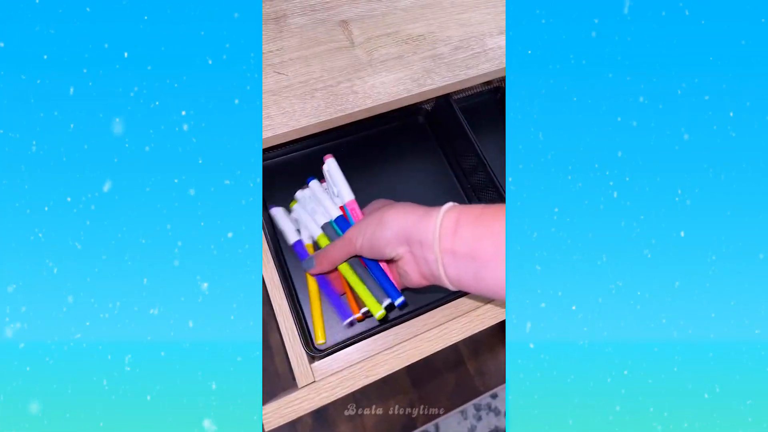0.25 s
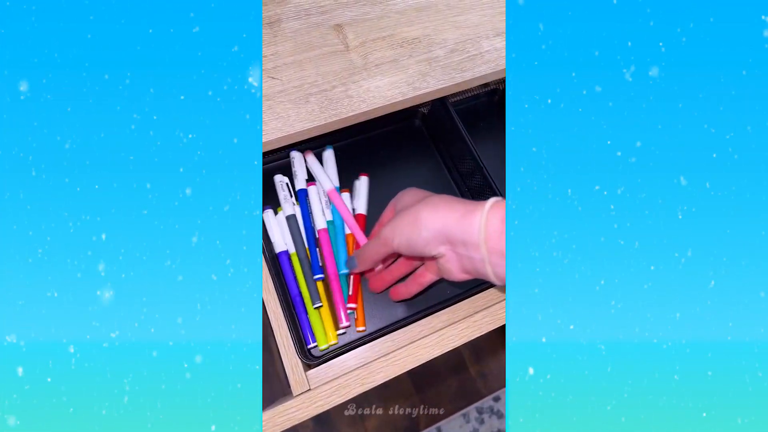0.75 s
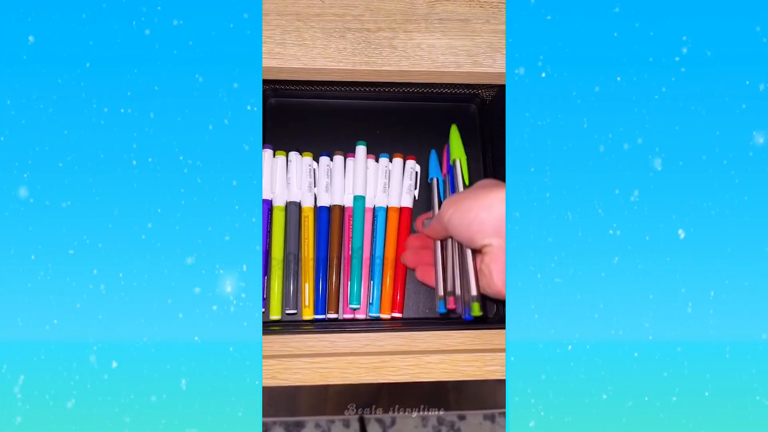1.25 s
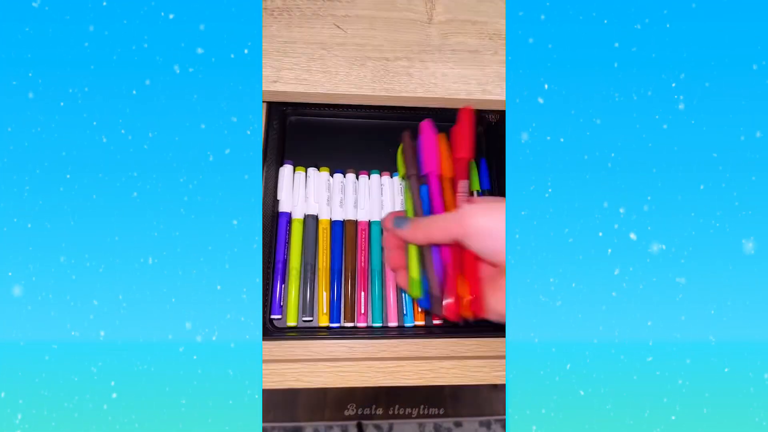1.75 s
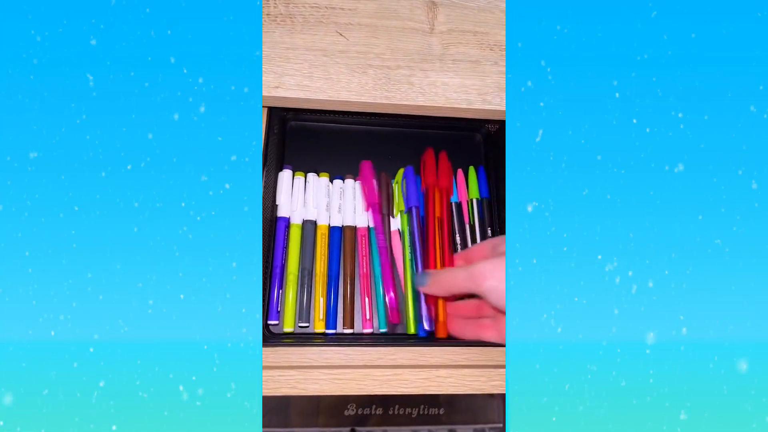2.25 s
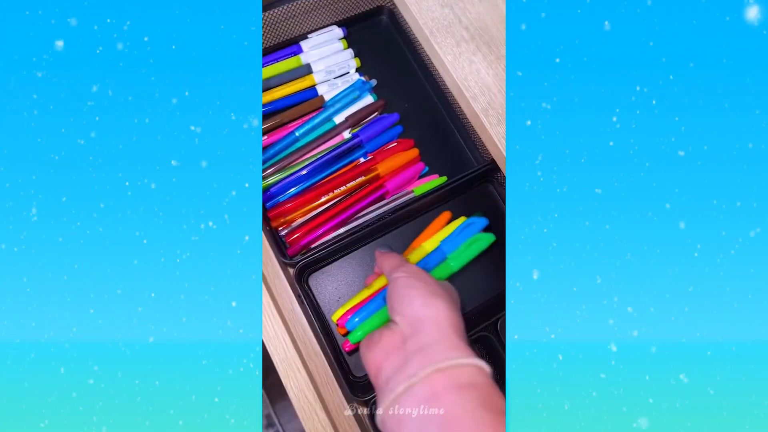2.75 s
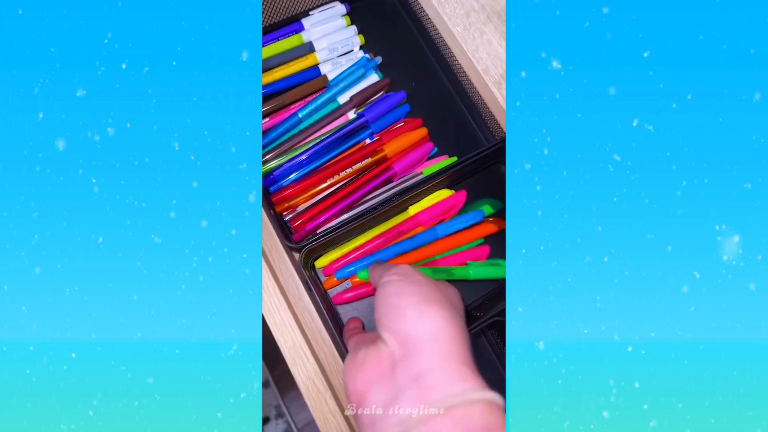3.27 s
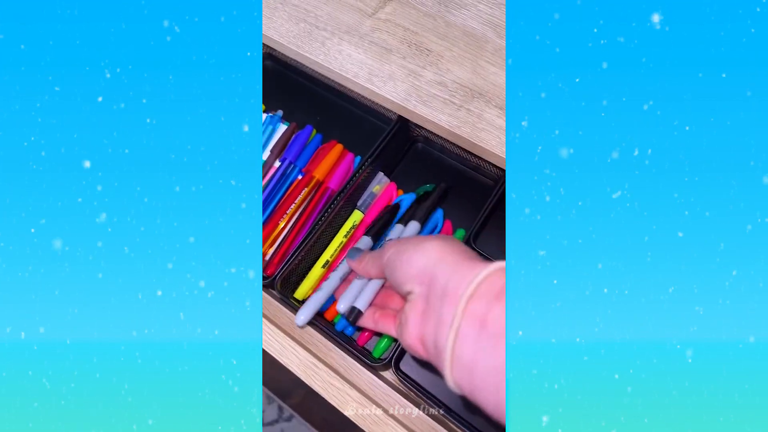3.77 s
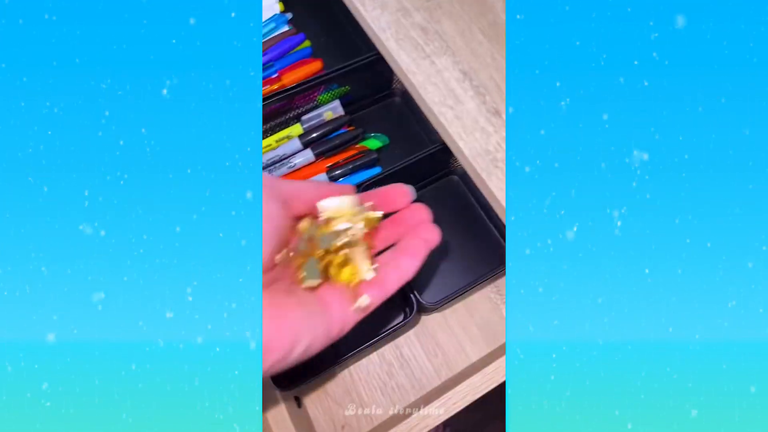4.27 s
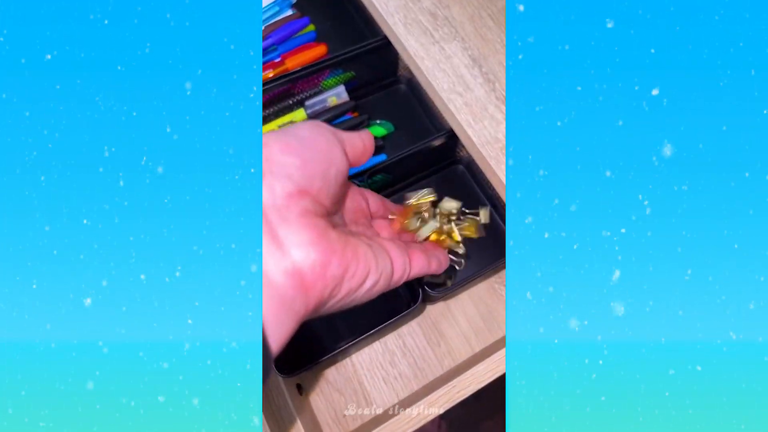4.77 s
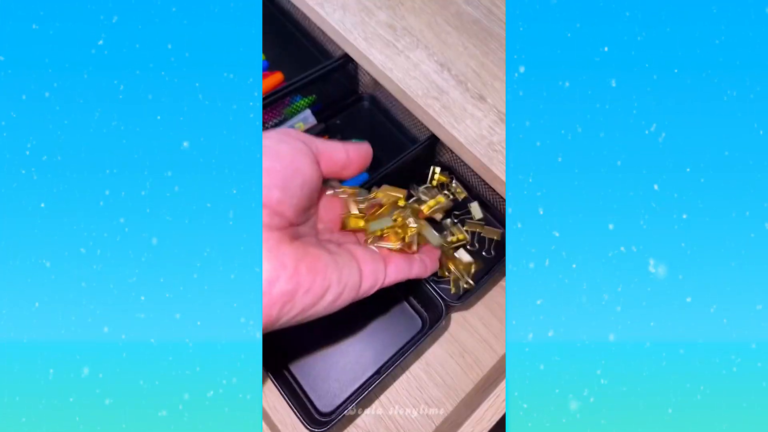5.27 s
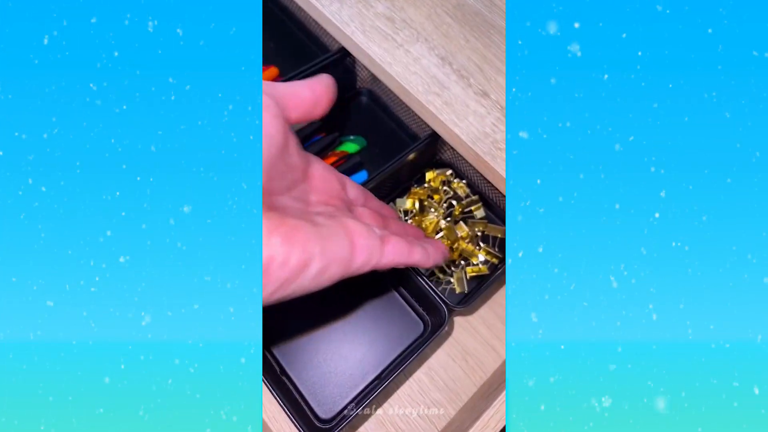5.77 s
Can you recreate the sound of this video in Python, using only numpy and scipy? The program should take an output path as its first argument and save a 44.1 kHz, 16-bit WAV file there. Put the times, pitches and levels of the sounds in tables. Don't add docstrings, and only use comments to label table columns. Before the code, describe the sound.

Very close to a phone microphone, hands lay handfuls of hollow plastic pens into a plastic tray in a wooden drawer, with clicks, knocks and dense rattling. Two handfuls of thicker markers follow, knocking harder. Then small metal clips jingle softly in the palm and spill in two bright, sharp clattering bursts. Faint hiss and low rumble lie beneath, with an appliance hum late on; the scene cuts abruptly between handfuls.

```python
import sys
import numpy as np
from scipy import signal
from scipy.fft import rfft, irfft
from scipy.io import wavfile
from scipy.ndimage import uniform_filter1d

SR = 44100
rng = np.random.default_rng(int(sys.argv[2]) if len(sys.argv) > 2 else 0)


def transcribe(signal):
    frames = np.atleast_2d(signal).T
    limited = np.clip(frames, -1, 1)
    pcm = np.round(limited * 32767).astype(np.int16)
    wavfile.write(sys.argv[1], SR, pcm)


def how_loud(loudness_db):
    steps = np.asarray(loudness_db, float) / 20
    return 10 ** steps


N = 265393


def evened(x):
    return x / np.sqrt(np.mean(x ** 2) + 1e-20)


def read(points, hz):
    f, value = np.transpose(points)
    return np.interp(np.log(hz + 1), np.log(f + 1), value)


def coloured_noise(spectrum, size, level_db):
    white = rfft(rng.standard_normal(size))
    colour = how_loud(read(spectrum, np.fft.rfftfreq(size, 1 / SR)))
    return how_loud(level_db) * evened(irfft(white * colour, size))


def rumble():
    # [t/s, level/dB]
    swell = [(0.0, -57), (0.742, -63), (1.839, -66), (2.029, -61), (2.83, -58), (3.59, -63.5),
             (4.07, -56.5), (4.91, -63), (5.14, -59), (6.02, -55)]
    spectrum = [(25, -16.0), (45, -11.5), (58, 8.0), (75, -17.0), (110, -43.5)]
    low = coloured_noise(spectrum, N, 0)
    return how_loud(np.interp(np.arange(N) / SR, *np.transpose(swell))) * low


def hiss(k, size):
    # [f/Hz, level per Hz/dB]
    early = [(53, -34), (90, -1), (114, -13.5), (151, -11.5), (172, -25), (219, -6), (244, -22), (429, -20),
             (769, -29), (1290, -29.5), (8350, -44.5), (15000, -64), (16000, -48.5)]
    # [f/Hz, level per Hz/dB]
    late = [(53, -27), (90, -11.5), (151, -11), (184, -18), (255, -6.5), (284, -24), (353, -12),
            (550, -17.5), (737, -22), (1470, -21), (1950, -26.5), (5650, -22), (7490, -29.5), (16000, -49)]
    take_db = [-56, -59.5, -60.5, -58.5, -57, -59, -57]
    return coloured_noise(early if k < 4 else late, size, take_db[k])


def hum(t):
    # [f/Hz, level/dB]
    tones = [(215.3, -68), (253.0, -60), (301.5, -64.5), (349.9, -62), (554.5, -93)]
    sway = evened(uniform_filter1d(rng.standard_normal((len(tones), len(t))), size=6000, axis=1))
    out = np.zeros(len(t))
    for (hz, db), wave in zip(tones, sway):
        strength = how_loud(db + np.clip(3.1 * wave, -3, 3))
        out += strength * np.sin(2 * np.pi * (hz * t + rng.random()))
    return out


def room(x):
    # [f/Hz, t60/s]
    decay = [(200, 0.38), (1500, 0.41), (5000, 0.053), (14000, 0.16)]
    taps = np.zeros(SR // 2)
    at = np.arange(100, len(taps) - 20, 10)
    taps[at + rng.integers(0, 10, len(at))] = rng.choice([-1., 1.], len(at))
    hz, t, z = signal.stft(taps, SR, nperseg=256)
    t60 = np.clip(read(decay, hz), .05, .27)[:, None]
    tail = signal.istft(z * how_loud(-60 * t / t60), SR, nperseg=256)[1]
    return signal.fftconvolve(x, tail / np.linalg.norm(tail))[:len(x)]


def shimmer(x, patchy_db):
    z = signal.stft(x, nperseg=256, noverlap=192)[2]
    patches = rng.standard_normal(z.shape)
    for hz_bins, frames in [(9, 17), (5, 5)]:
        patches = uniform_filter1d(patches, size=hz_bins, axis=0)
        patches = uniform_filter1d(patches, size=frames, axis=1)
    gain = how_loud(patchy_db * evened(patches) - 0.29 * patchy_db ** 2)
    return signal.istft(z * gain, nperseg=256, noverlap=192)[1][:len(x)]


def causal(db):
    log_gain = np.log(how_loud(np.maximum(db, -100)))
    circle = np.concatenate([log_gain, log_gain[-2:0:-1]])
    taps = np.fft.ifft(np.exp(np.conj(signal.hilbert(circle)))).real[:len(db) // 2]
    return taps / np.linalg.norm(taps)


def registers(spectrum, modes, top, k):
    ring_depth = [1, 0.93, 0.81, 0.8, 0.65, 1, 0.95]
    hz = np.fft.rfftfreq(8192, 1 / SR) + 1
    lifts = ring_depth[k] * sum(lift / (1 + (2 * (hz - f) / width) ** 2) for f, width, lift in modes)
    db = read(spectrum, hz) + lifts
    over_tray = -10 * np.log10(1 + (900 / hz) ** 8)
    under_tray = -10 * np.log10(1 + (hz / 900) ** 8)
    over_body = -10 * np.log10(1 + (6800 / hz) ** 24)
    under_body = -10 * np.log10(1 + (hz / 6600) ** 40)
    body = causal(db + over_tray + under_body)
    bright = causal(read(top, hz) + lifts + over_body)
    return body, bright, causal(db + under_tray)


def thuds(t):
    # [t/s, level/dB, f/Hz]
    knocks = [(0.422, -26, 470), (0.503, -38, 307.0), (0.58, -24.5, 318), (0.667, -30, 301.0),
              (0.812, -24, 324), (2.184, -27, 320), (2.247, -27, 307), (2.332, -28, 305), (2.361, -25, 329),
              (2.411, -30, 295), (3.187, -45, 354), (3.226, -25, 305), (3.298, -27, 307),
              (3.356, -29.5, 380), (3.391, -32, 357), (3.424, -29, 388), (4.012, -31, 368),
              (4.642, -30, 461), (4.701, -18.5, 468.6), (4.792, -24.5, 472), (4.823, -24, 478),
              (4.903, -36, 495), (4.96, -27, 481), (5.373, -28.5, 484), (5.541, -31, 300),
              (5.585, -27, 301.0),
              (2.845, -49, 305),
        (4.7, -30.5, 272),
        (3.8, -27, 285),
    ]
    rise_s, t60_s, level_db = 0.0048, 0.17, -0.5
    out = np.zeros(len(t))
    for s, db, hz in knocks:
        age = np.maximum(t - s, 0) * (t[0] <= s)
        fade = how_loud(db + level_db - 60 * age / t60_s)
        out += np.tanh(age / rise_s) * fade * np.sin(2 * np.pi * hz * age)
    return out


def contacts(size, per_s, spread_db):
    touch = rng.random(size) < per_s / SR
    sign = rng.choice([-1., 1.], size)
    return evened(touch * sign * how_loud(spread_db * np.minimum(rng.exponential(1, size), 4)))


def stirring(k, t):
    # [t/s, effort/dB]
    efforts = [
        [(0.0, -63), (0.097, -66)],
        [(0.1, -50), (0.158, -47), (0.26, -51.5), (0.398, -36.5), (0.478, -38.5), (0.658, -32.5),
         (0.818, -39.5), (0.98, -41)],
        [(1.24, -67), (1.444, -51.5), (1.536, -36.5), (1.632, -35.5), (1.752, -45.5), (1.796, -54)],
        [(1.912, -45), (1.968, -48.5), (2.076, -47.5), (2.314, -34.5), (2.374, -30), (2.49, -38.5),
         (2.537, -51.5)],
        [(2.975, -61), (3.031, -38), (3.149, -37.5), (3.293, -33), (3.427, -48.5), (3.457, -41)],
        [(3.815, -36), (3.867, -41), (3.987, -48), (4.053, -43.5), (4.235, -41.5)],
        [(4.647, -70), (4.697, -26), (4.821, -26.5), (4.933, -25), (5.065, -31), (5.125, -42)],
        [(5.347, -63), (5.397, -29.5), (5.517, -30), (5.577, -26), (5.769, -44.5), (5.885, -44.5),
         (6.02, -48.5)],
    ]
    # [t/s, jingle/dB]
    slides = [
        [(4.235, -46), (4.439, -33.5), (4.567, -27.5), (4.645, -32.5), (4.697, -44), (4.821, -22), (4.933, -24),
         (5.065, -28.5), (5.125, -37)],
        [(5.125, -35.5), (5.267, -29), (5.34, -29.5), (5.397, -27), (5.517, -25), (5.577, -20), (5.769, -38.5),
         (5.885, -41), (6.02, -57)],
    ]
    # [bright top/dB, tray/dB]
    shares = [(-54.5, -41.5), (-52.5, -51.5), (-49.5, -46), (-52.5, -42.5), (-51, -47.5), (-72, -50.5),
              (-68, -55.5)]
    top_per_effort, tray_per_effort = 1, 0.52
    slide_body_db, slide_tray_db = -30.5, -28.5
    gains = np.zeros((3, len(t)))
    top_db, tray_db = shares[k]
    for rows in efforts + slides:
        s, db = np.transpose(rows)
        inside = (t >= s[0]) & (t <= s[-1])
        db = np.interp(t, s, db)
        if rows in slides:
            gains += inside * how_loud([db + slide_body_db, db, db + slide_tray_db])
        else:
            over = db + 40
            gains += inside * how_loud([db, top_db + top_per_effort * over, tray_db + tray_per_effort * over])
    return gains


def rattle(gains, t, per_s, spread_db, clacks_per_s, clack_s, bed):
    clacks = abs(contacts(len(t), clacks_per_s, spread_db=1.1))
    clumps = evened(signal.lfilter([1], [1, -np.exp(-1 / (clack_s * SR))], clacks))
    scraping = [[.2], [.45], [.6]] * rng.standard_normal((3, len(t)))
    touch = contacts(len(t), per_s, spread_db) + scraping
    return gains * evened(touch * (bed + clumps))


def widened(force, gain):
    gentle_db, lively_db = -49, -20
    band = signal.butter(2, (7900, 10200), "band", fs=SR, output="sos")
    narrow = signal.sosfiltfilt(band, force)
    share = np.clip((20 * np.log10(gain + 1e-9) - gentle_db) / (lively_db - gentle_db), .2, 1)
    return narrow + share * (force - narrow)


def ticks(rows, size, start, tick_db, tick_s, ring_s, ring_db, snap):
    force, t = np.zeros((3, size + 1000)), np.arange(1000) / SR
    onset = t / 0.0012 * np.exp(1 - t / 0.00091)
    shape = onset + np.tanh(t / 0.0017) * how_loud(-5.5 - 60 * t / tick_s)
    for s, db, hz, top_db in rows:
        touch = shape * rng.choice([-1., 1.], len(t)) * rng.exponential(0.58, len(t))
        touch[24] = snap
        ring = how_loud(-60 * t / ring_s) * np.sin(2 * np.pi * hz * t)
        body = touch + how_loud(ring_db) * np.convolve(touch, ring / np.linalg.norm(ring))[:len(t)]
        at = round((s - start) * SR)
        force[:2, at:at + len(t)] += how_loud(db + tick_db) * np.array([body, how_loud(top_db + 1.0) * touch])
    return force[:, :size]


def landed(rows, k):
    # [thump/dB, clatter t60/s]
    landing = [(-19, 0.27), (-13, 0.21), (-15.5, 0.18), (-26.5, 0.15), (-21, 0.14), (-10.5, 0.082),
               (-9.5, 0.09)]
    thump_db, t60 = landing[k]
    out = []
    for row in rows:
        brighter = row[3] + 15
        out.append((*row, thump_db - 0.35 * brighter, t60 * how_loud(0.5 * brighter)))
    return out


def blows(rows, size, start, clatter_db, crack_db, crack_s, ring_db, ring_s, rise_s, top_share):
    force, t = np.zeros((3, size + 7000)), np.arange(7000) / SR
    for s, peak_db, hz, top_db, tray_db, t60 in rows:
        settle = np.clip((peak_db + 60.5) / 30, .2, 1)
        t60 = np.clip(t60, .02, .22) * settle * np.array([[1], [top_share], [1.2]])
        rise = np.tanh(t / (rise_s * np.array([[1], [2.2], [1.5]])))
        crack = how_loud(crack_db + np.array([[0], [8.5], [0]]) - 60 * t / crack_s)
        fade = rise * (how_loud(-60 * t / t60) + crack)
        clatter = contacts(size=len(t), per_s=4200, spread_db=2.0)
        clatter[round(rise_s * SR)] = 4.3
        clatter = clatter * fade
        clatter *= how_loud(clatter_db) * np.linalg.norm(fade[0]) / np.linalg.norm(clatter[0])
        ring = how_loud(-60 * t[:800] / min(ring_s, .014)) * np.sin(2 * np.pi * hz * t[:800])
        strike = clatter[0] * how_loud(-60 * t / 0.0092)
        clatter[0] += how_loud(ring_db) * signal.oaconvolve(strike, ring / np.linalg.norm(ring))[:len(t)]
        cutoff_hz = np.clip(9000 * how_loud(0.72 * (top_db + 18.0)), 3600, 16000)
        soft = np.exp(-2 * np.pi * cutoff_hz / SR)
        clatter[0] = signal.lfilter([np.sqrt(1 - soft ** 2)], [1, -soft], clatter[0])
        at = round((s - start) * SR)
        force[:, at:at + len(t)] += how_loud(peak_db + np.array([[0], [top_db + 7.5], [tray_db + 6.0]])) * clatter
    return force[:, :size]


def ringing(force, responses, wet_db, patchy_db):
    close = sum(signal.oaconvolve(f, r)[:len(f)] for f, r in zip(force, responses))
    return shimmer(close + how_loud(wet_db) * room(close), patchy_db)


def within(rows, start, end):
    return [row for row in rows if start <= row[0] < end]


def plastic_take(k, t, start, end):
    # [f/Hz, level per Hz/dB]
    pens = [(47, -60), (80, -15), (217, -13.5), (309, -6), (369, -10), (461, -13.5), (751, -15.5),
            (1020, -13), (1310, -1), (2970, -4.5), (3240, -6), (3870, -1.5), (6740, -10.5), (11000, -15.5),
            (16000, -21)]
    # [f/Hz, level per Hz/dB]
    markers = [(47, -54), (80, -7.5), (242, -11), (303, -11), (441, -5), (493, -7), (1050, -15.5),
               (1700, 4), (2780, -0.5), (3540, -0.5), (6030, -3), (6740, -16), (7870, -11.5),
               (14600, -26.5), (16000, -23.5)]
    # [f/Hz, width/Hz, lift/dB]
    pen_modes = [(314, 150, 1.5), (499, 35.7, 6.5), (1290, 40, 0.5), (1430, 77, 3.5), (1933, 14, 9),
                 (2370, 220, 5.5), (2970, 130, 7), (10600, 760, 5)]
    # [f/Hz, width/Hz, lift/dB]
    marker_modes = [(326, 150, 12.7), (1720, 62, 2), (2170, 150, 3.4), (3000, 350, 3.1), (4170, 2200, 9.7)]
    # [t/s, peak/dB, ring f/Hz, brightness/dB]
    pen_blows = [(0.0981, -19.5, 3150, -30.5), (0.166, -33, 1910, -9), (0.2117, -25, 1275, -14.5),
                 (0.2652, -20, 1720, -26.5), (0.2793, -16, 4110, -10), (0.298, -15.5, 1550, -31),
                 (0.358, -22.5, 2020, -16), (0.401, -15, 2000, -13.5), (0.408, -12, 4170, -16),
                 (0.4626, -19.5, 1930, -13.5), (0.499, -21, 1370, -14), (0.5028, -7.5, 2970, -15.5),
                 (0.603, -15.5, 1840, -20.5), (0.659, -13.5, 2340, -20), (0.743, -25, 1800, -18),
                 (0.7819, -13, 3150, -18), (0.8165, -14, 2970, -18), (0.917, -12, 4090, -13),
                 (0.9265, -14, 2730, -14.5),
                 (1.2298, -39.5, 2500, -10), (1.2576, -30, 2370, -16), (1.2828, -34.5, 3550, -16),
                       (1.307, -34, 1550, -51), (1.325, -23, 4100, -14), (1.3521, -26.5, 3130, -16.5),
                       (1.3724, -28.5, 1500, -12), (1.439, -24, 1570, -20), (1.456, -16, 2850, -17),
                       (1.468, -21.5, 1640, -4), (1.4951, -14, 1980, -14.5), (1.5828, -18.5, 2820, -22),
                       (1.6224, -15, 6200, -6), (1.649, -17.5, 3500, -17), (1.91, -17.5, 1490, -35),
                       (2.004, -22.5, 2080, -33), (2.0954, -28.5, 1290, -6.5), (2.153, -17.5, 5140, -14),
                       (2.1621, -20, 4930, -13), (2.1844, -15, 1650, -12), (2.2278, -12, 4940, -15),
                       (2.2471, -15, 4550, -7.5), (2.27, -17.5, 2230, -4.5), (2.332, -21, 1980, -4),
                       (2.357, -10, 2370, -13.5), (2.4172, -24, 4130, -3.5), (2.4608, -14.5, 2460, -18)]
    # [t/s, peak/dB, ring f/Hz, brightness/dB]
    marker_blows = [(2.729, -42.5, 2600, -11.5), (2.7397, -44.5, 3630, -10), (2.8424, -38.5, 3320, -12.5),
                    (2.8538, -48, 3000, -31), (2.9739, -9.5, 2150, -18), (3.039, -14, 2290, -17.5),
                    (3.0573, -12, 1890, -12.5), (3.0667, -3.5, 2230, -20.5), (3.1322, -14.5, 3270, -26),
                    (3.19, -6, 2500, -21), (3.233, -10.5, 2100, -24), (3.3018, -8.5, 4000, -24),
                    (3.3877, -8, 2270, -19), (3.431, -5, 1640, -18), (3.8112, -17, 1720, -16),
                    (3.827, -11.5, 4300, -18.5), (3.961, -27, 2560, -14), (4.016, -7, 3760, -16),
                    (4.07, -18.5, 4440, -14), (4.1595, -11, 4230, -13), (4.186, -29, 1700, -45)]
    # [t/s, level/dB, ring f/Hz, brightness/dB]
    plastic_ticks = [(0.1, -33, 2370, -17), (0.149, -43, 5900, 2), (0.265, -24.5, 1610, -26.0),
                     (0.276, -33, 1510.0, -31.0), (0.2798, -19, 4120, -15), (0.3, -27, 2000.0, -18),
                     (0.339, -31, 1540, -16), (0.377, -28.5, 5000, -15), (0.4026, -24.5, 1870.0, -16),
                     (0.412, -26, 3980.0, 6), (0.4676, -19, 1940.0, -10), (0.509, -20, 3050, -12),
                     (0.5824, -21, 1970, -20.0), (0.6065, -19, 3880.0, -5), (0.6598, -17, 4680, -4),
                     (0.742, -28, 2840, -12), (0.8179, -20, 2860, -21.5), (0.9179, -24, 3870, -5),
                     (0.9291, -26, 2600, -3), (1.218, -61, 6400, 10), (1.3096, -38, 1530.0, -21),
                     (1.3259, -22, 3870, -12), (1.3308, -28, 3100, -11), (1.3534, -34, 2850, -13.0),
                     (1.3708, -24.5, 5980, -3), (1.46, -24, 2100, -19.0), (1.5838, -30, 2710.0, -15.5),
                     (1.625, -16.5, 6200, 3), (1.6535, -15.5, 3450, -16), (1.621, -26, 6000, 3),
                     (1.9129, -27, 1410, -18), (1.966, -44.5, 6000, 11), (2.1641, -21, 4800, -17),
                    (2.3359, -20.5, 3860, 3.5), (2.4672, -24, 1770, -19), (2.888, -54.5, 3000, -5),
                    (2.711, -59, 3460, -21), (2.7597, -56, 3380, 1), (2.8109, -58, 3530, -12),
                    (2.8524, -49, 2040, -7), (2.860, -50, 2820, -12), (2.9166, -55, 1940.0, -14.0),
                    (2.9743, -13, 2000, -27.5), (3.0395, -21, 3200, -8), (3.0299, -27, 2300, -3),
                    (3.0583, -15, 1860, -19), (3.0708, -15.5, 3120, -15), (3.1972, -21, 3170, -25.0),
                    (3.132, -23, 4500, 1), (3.234, -23, 2040, -22.0), (3.4322, -15, 2170.0, -25.0),
                    (3.7704, -53, 5600.0, -13.0), (3.891, -28, 2350, -5.5), (3.976, -31, 5600, -14),
                    (4.0166, -9.5, 3545, -27), (3.903, -35, 3000, 0), (3.9592, -21.5, 3950, -4),
                    (4.2326, -45.5, 5710.0, 20)]
    hits = landed(within(pen_blows + marker_blows, start, end), k)
    sharp = within(plastic_ticks, start, end)
    force = blows(hits, len(t), start, clatter_db=-15.0, crack_db=-6.0, crack_s=0.022,
                  ring_db=-0.5, ring_s=0.03, rise_s=0.001, top_share=0.69)
    heap = rattle(stirring(k, t), t, per_s=2000, spread_db=2.0, clacks_per_s=140, clack_s=0.005, bed=1.1)
    force = force + how_loud(1.5) * heap
    force = force + ticks(sharp, len(t), start, tick_db=-6.5, tick_s=0.011, ring_s=0.022, ring_db=-1.5, snap=2.8)
    colour, modes = (pens, pen_modes) if k < 3 else (markers, marker_modes)
    return ringing(force, registers(colour, modes, colour, k), wet_db=-4.5, patchy_db=1.1)


def metal_take(k, t, start, end):
    # [f/Hz, level per Hz/dB]
    clips = [(47, -82), (80, -15.5), (220, -12.5), (330, -1.5), (387, -10), (468, -12), (797, -13.5),
             (876, -15), (1260, -19), (2020, -11), (2490, -12.5), (2900, -12.5), (7500, -16.5), (9750, -36),
             (16500, -120)]
    # [f/Hz, width/Hz, lift/dB]
    clip_modes = [(473, 39, 15), (2000, 104, 6.9), (2910, 155, 7.4), (4190, 1200, 6.9), (5600, 170, 3.2),
                  (9200, 3600, 3.9)]
    # [f/Hz, level per Hz/dB]
    jingle = [(3530, -37), (6000, -44), (6700, -17.5), (7500, -8.5), (8200, -11), (9120, -10), (10600, -8),
              (11900, -12.5), (13800, -8.5), (15400, -12), (16000, -17.5)]
    # [t/s, peak/dB, ring f/Hz, brightness/dB]
    clip_blows = [(4.3742, -51, 5930, 24), (4.4254, -46, 5900, 29.5), (4.2355, -52, 5900, 28),
                  (4.465, -38.5, 4350, 19.5), (4.545, -40.5, 4200, 27), (4.6456, -7, 4170, -7.5),
                  (4.6573, -12, 2050, -21), (4.6887, -7, 4330, -4), (4.696, -14.5, 2170, 2.5),
                  (4.719, -11, 2000, -3), (4.7448, -17.5, 2250, 5.5), (4.7625, -10.5, 4130, -0.5),
                  (4.784, -21.5, 2000, 5), (4.8241, -14, 2000, -19), (4.844, -14.5, 2780, -7),
                  (4.862, -14.5, 2090, -26), (4.885, -23, 4380, 9), (4.9064, -11, 4460, -10),
                  (4.931, -21, 4540, -29), (4.9491, -13, 2910, 3), (4.9784, -10.5, 4500, -6.5),
                  (5.0193, -17.5, 1920, -1), (5.118, -27, 4400, 0),
                  (5.976, -42, 4030, 0), (5.3464, -11, 4500, -0.5), (5.3739, -9.5, 3000, -0.5),
                    (5.4119, -11, 3050, -1), (5.4268, -9, 3060, -3.5), (5.4461, -13.5, 3900, -0.5),
                    (5.52, -11.5, 2980, -2), (5.5447, -10, 2370, -3), (5.553, -34, 3900, -19),
                    (5.572, -18, 2360, -25), (5.593, -14, 2380, -5), (5.660, -14, 4900, -2),
                    (5.736, -17.5, 2350, -2), (5.843, -20, 3440, 1.5)]
    # [t/s, level/dB, ring f/Hz, brightness/dB]
    clip_ticks = [(4.3274, -62, 3020, 12), (4.3963, -59, 3270.0, 30), (4.4579, -47, 5800, 23),
                  (4.5372, -50, 6050.0, 28), (4.5791, -45, 3670, 26), (4.6493, -12.5, 4030, 5),
                  (4.6584, -20, 3980, 9), (4.6875, -12.5, 4250, -14), (4.719, -8.5, 2810, -8),
                  (4.7477, -19, 4830, 5.0), (4.7871, -16, 2050, -1.0), (4.834, -27, 2070, -1),
                  (4.843, -21.0, 2870, 7), (4.867, -19.5, 4600, -5), (4.8846, -23, 4180, 13.5),
                  (4.9056, -29, 4370, 12), (4.9125, -18, 2260, 3), (4.9505, -32, 3820, -1),
                  (4.9821, -19, 4140, 6), (5.12, -29, 4180.0, 1), (5.1438, -51, 6500, 25),
                  (5.2204, -51.0, 6270, 17), (5.2583, -55, 6400.0, 24.0), (5.265, -56, 4480.0, 29),
                  (5.3249, -47, 6370.0, 23.0), (5.372, -13, 2970, 1), (5.3763, -15, 4160.0, -3),
                  (5.4329, -22, 2320, 12), (5.545, -14, 2320, 5), (5.5516, -15, 2860, 6),
                  (5.573, -18, 2300, 3), (5.5943, -30, 2300, -4), (5.6612, -21.5, 4600, 10.5),
                  (5.6676, -29.5, 4240, 17), (5.738, -30.5, 3980, 13), (5.7454, -27.5, 2160, 12),
                  (5.8026, -41.0, 2350.0, 4), (5.8435, -25.5, 2270, 3)]
    hits = landed(within(clip_blows, start, end), k)
    sharp = within(clip_ticks, start, end)
    force = blows(hits, len(t), start, clatter_db=-17.0, crack_db=-1.0, crack_s=0.0093,
                  ring_db=3.0, ring_s=0.016, rise_s=0.0012, top_share=0.68)
    gains = stirring(k, t)
    heap = rattle(gains, t, per_s=2600, spread_db=2.0, clacks_per_s=280, clack_s=0.011, bed=0.92)
    heap = how_loud(-3.5) * heap
    force = force + [heap[0], widened(heap[1], gains[1]), heap[2]]
    force = force + ticks(sharp, len(t), start, tick_db=-5.0, tick_s=0.0073, ring_s=0.029, ring_db=-5.5, snap=3.5)
    return ringing(force, registers(clips, clip_modes, jingle, k), wet_db=-6.0, patchy_db=1.17)


def scene():
    cuts = [0, .980, 1.797, 2.540, 3.458, 4.235, 5.125, 6.02]
    out = np.zeros(N)
    for k, (start, end) in enumerate(zip(cuts, cuts[1:])):
        t = np.arange(round(start * SR), min(round(end * SR), N)) / SR
        handful = plastic_take if k < 5 else metal_take
        sound = handful(k, t, start, end) + thuds(t) + hiss(k, len(t))
        if k >= 4:
            sound = sound + hum(t)
        out[round(start * SR):][:len(t)] = sound * signal.windows.tukey(len(t), .002)
    return (out + rumble())[None]


def band_limit(x):
    return signal.sosfilt(signal.butter(12, 16810, fs=SR, output="sos"), x)


def record(dry):
    edge = signal.firwin(511, 15800, window=("kaiser", 9), fs=SR)
    held = 1.3 * np.tanh(dry / 1.3)
    return band_limit(signal.oaconvolve(held, edge[None], "same"))


dry = scene()
out = record(dry)
transcribe(out)
```